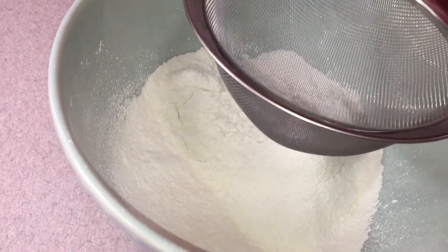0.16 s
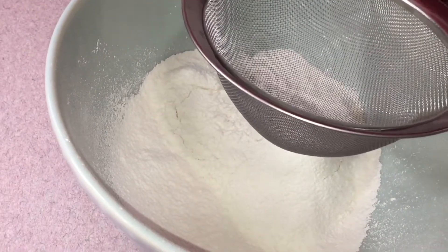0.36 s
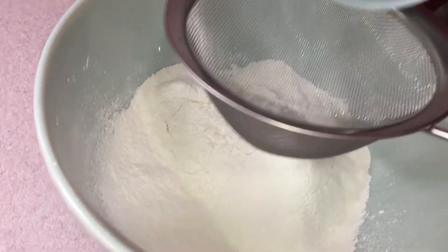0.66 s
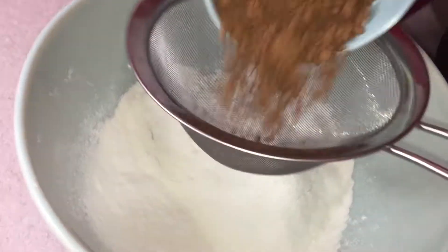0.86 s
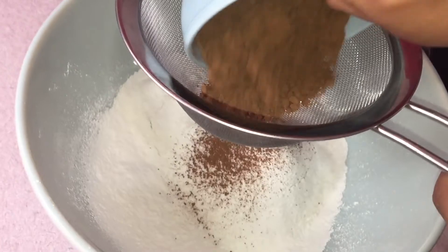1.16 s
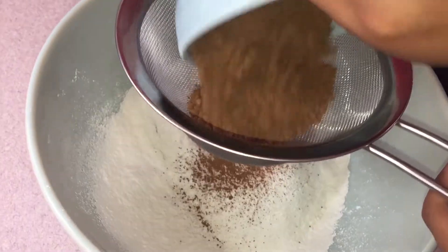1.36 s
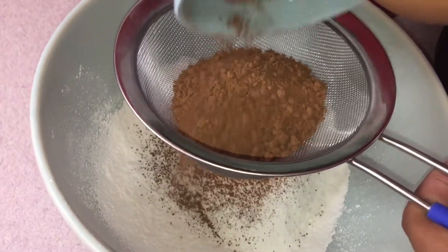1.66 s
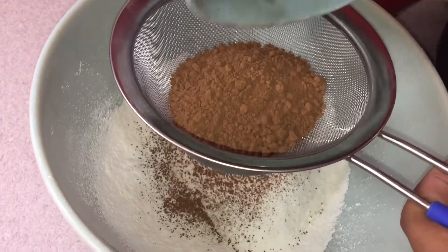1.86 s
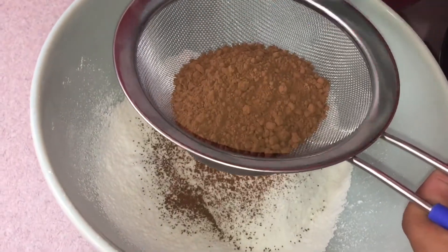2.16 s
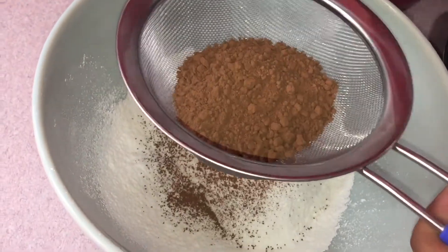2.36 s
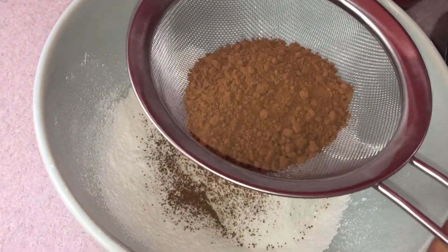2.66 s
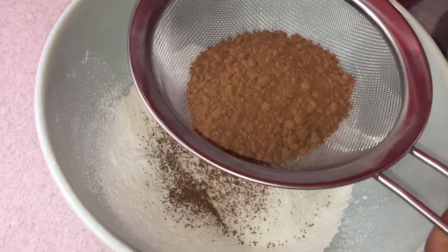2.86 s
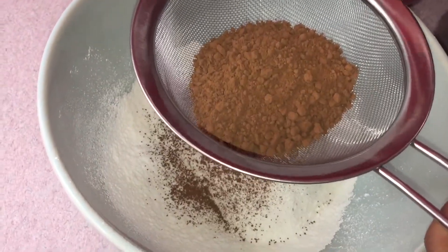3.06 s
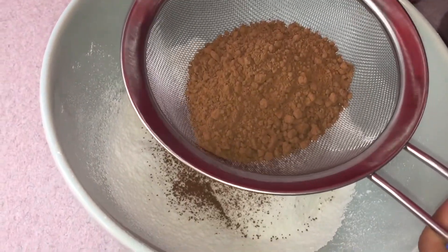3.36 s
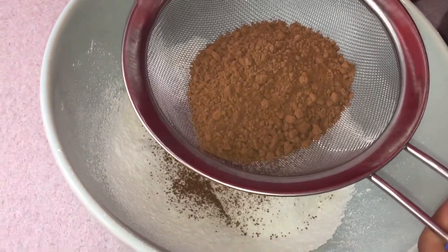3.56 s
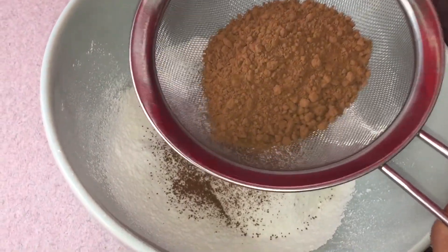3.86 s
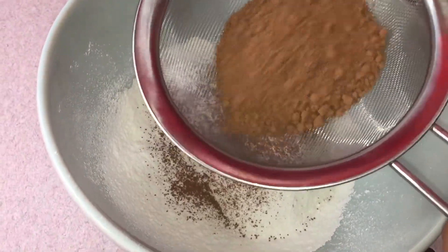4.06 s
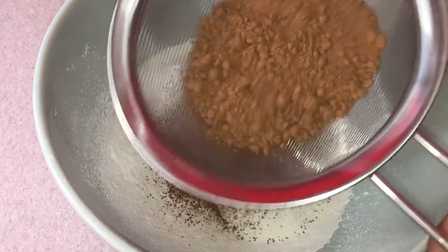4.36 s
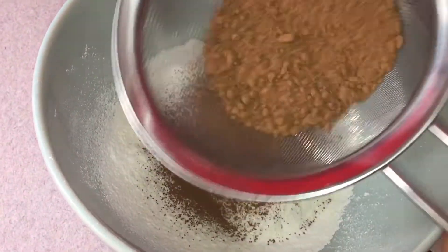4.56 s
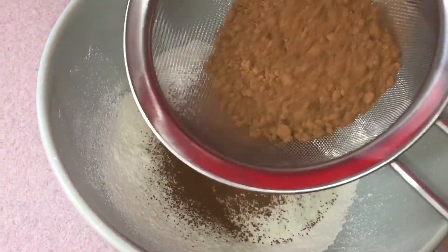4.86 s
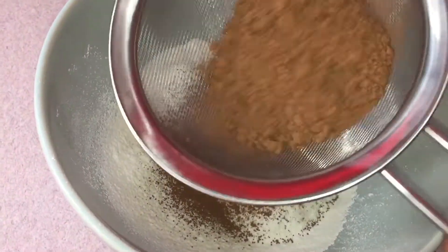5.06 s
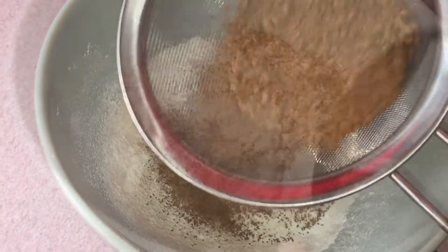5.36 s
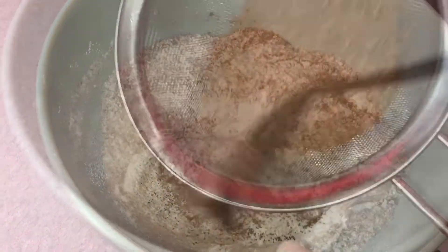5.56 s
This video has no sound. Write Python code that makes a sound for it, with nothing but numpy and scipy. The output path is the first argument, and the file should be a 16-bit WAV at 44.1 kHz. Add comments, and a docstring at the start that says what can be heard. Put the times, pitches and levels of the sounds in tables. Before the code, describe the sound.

In a quiet humming kitchen, faint powder pouring, a plastic cup rattling down on a table, then rhythmic raspy sieve taps with soft booms.

```python
"""Cocoa through a sieve

Cocoa is tipped from a plastic cup into a wire sieve over a mixing bowl, in a quiet, humming kitchen.
The cup ticks on the rim, then knocks on the table, rocks and settles. About five taps a second make the
sieve's mesh rasp and the powder hop and land, while dull bumps shake the table.
Noise makes the rasp, powder and air; short clicks and dying sines make the blows and their ringing.
"""
import sys
import numpy as np
from scipy import signal
from scipy.fft import rfft, irfft
from scipy.io import wavfile
from scipy.ndimage import uniform_filter1d

SR = 44100
rng = np.random.default_rng(int(sys.argv[2]) if len(sys.argv) > 2 else 0)


def wrap_up_sound(samples):
    """Save the sound to the file named by the first command line argument, as 16-bit audio."""
    columns = np.atleast_2d(samples).T
    # keep every value between -1 and 1, then stretch to whole-number steps
    tamed = np.clip(columns, -1, 1)
    steps = np.round(tamed * 32767).astype(np.int16)
    wavfile.write(sys.argv[1], SR, steps)


N = 252252  # length of the scene in samples

# taps on the sieve: (time [s], mesh rasp [dB], frame click [dB], hand's thud [dB], rebound against the tap [dB])
SIEVE_TAPS = [(4.0785, -54.5, -72, -54.5, -6), (4.2485, -47.5, -64.5, -56, -15.5),
              (4.431, -47.5, -53.5, -42.5, 6.5), (4.6208, -45.5, -50.5, -39, -0.5),
              (4.812, -43.5, -57, -34.5, -17), (5.0001, -44, -48.5, -39, -7), (5.189, -41.5, -42, -35, -29),
              (5.3757, -48, -49, -41.5, -23.5), (5.5616, -47, -49.5, -40.5, -24)]
# colour of the wire mesh: (frequency [Hz], relative level [dB])
MESH_COLOUR = [(1180, -1.5), (2000, -4), (2360, 3.5), (2570, -36), (2910, -10), (3520, -3), (6940, 6),
               (8930, 0.5), (10400, -5.5), (12200, -3), (15100, -8), (16000, -5.5)]
# colour of a hard contact with the table: (frequency [Hz], relative level [dB])
TABLE_CLICK_COLOUR = [(500, -18.5), (1500, -10), (2600, 9), (3450, -3.5), (4100, 0), (5000, -14), (6100, 1),
                      (7300, -5), (9000, -4), (10200, -12), (11000, -12.5), (13000, -24), (16000, -38.5)]


def sieve(snap_t60=0.025, rustle_db=-9, rustle_t60=0.15, rise_s=0.00055, grain_db=1.0):
    """Each tap clicks the frame and jolts the mesh, whose wires rasp as the grains skip over them."""
    # colour of the frame: (frequency [Hz], relative level [dB])
    frame_colour = [(100, -6), (330, 6.5), (420, 12.5), (540, -4), (680, 11), (1050, 0), (1250, -5.5),
                    (1800, -0.5), (2200, -8.5), (2900, 0.5), (4000, -11.5), (7000, -1), (16000, -80)]
    # colour of the hand's thud: (frequency [Hz], relative level [dB])
    thud_colour = [(25, -48), (45, -25), (68, 2), (110, 1), (165, -0.5), (240, -10.5), (340, -7),
                   (430, -17.5), (520, -18), (1000, -50), (3000, -62)]
    # the steel rim rings: (time [s], level [dB])
    pings = [(4.446, -55)]
    # ringing tones of the rim: (frequency [Hz], relative level [dB], time to fall 60 dB [s])
    rim_modes = [(2342, 0, .3), (2891, -9, .12), (3284, -3.5, .19), (4700, -6, .14)]
    rebound_s = 0.0146  # the mesh springs back and rasps again
    thud_delay_s = 0.002055  # the soft hand pushes a little later

    t = np.arange(SR // 3) / SR
    snap = gain_of(-60 * t / snap_t60)
    rustle = gain_of(rustle_db - 60 * t / rustle_t60)
    jolt = (snap + rustle) * (1 - np.exp(-t / rise_s))

    shake_power, frame, thuds = np.zeros((3, N))
    frame_click = click(frame_colour)
    thud = click(thud_colour, size=8192)
    for s, rasp_db, click_db, thud_db, rebound_db in SIEVE_TAPS:
        # overlapping jolts add as power
        add(shake_power, s, (gain_of(rasp_db) * jolt) ** 2)
        add(shake_power, s + rebound_s, (gain_of(rasp_db + rebound_db) * jolt) ** 2)
        add(frame, s, gain_of(click_db) * chatter(frame_click, db=5.0, t60=0.026))
        add(thuds, s + thud_delay_s, gain_of(thud_db) * thud)
    for s, db in pings:
        add(frame, s, gain_of(db) * ring(rim_modes))

    # the grains make the rasp's strength flicker quickly
    flicker = evened(uniform_filter1d(rng.standard_normal(N), size=40))
    grains = evened(gain_of(grain_db * flicker))
    rasp = np.sqrt(shake_power) * grains * noise(MESH_COLOUR)
    return room(rasp + frame + thuds, early_db=-15, tail_db=-14.0, early_t60=0.065)


def powder():
    """Cocoa hisses and patters as it pours onto the mesh, slides with each swing and lands after each tap."""
    # cocoa pours from the cup: (middle [s], length [s], hiss level [dB])
    pours = [(0.823, 0.49, -79.5), (0.978, 0.1, -65), (1.263, 0.21, -77), (1.447, 0.084, -76.5)]
    # colour of the soft patter: (frequency [Hz], relative level [dB])
    patter_colour = [(200, -18), (500, 11.5), (780, 11), (1200, 8), (1700, 4), (3000, 2.5), (6000, -60),
                     (15000, -45)]
    pour_patter_db = -5  # patter against the hiss
    powder_top_hz = 11500  # loose powder hisses more dully than the tapped mesh
    # slide during the swing and landing after the hop; levels are against the tap's rasp
    swing_lead_s, swing_s, swing_hiss_db, swing_patter_db = 0.0075, 0.057, -24, -24
    hop_s, landing_s, landing_hiss_db, landing_patter_db = 0.074, 0.057, -23, -20

    flows = [(s, length, db, db + pour_patter_db) for s, length, db in pours]
    for s, rasp_db, *_ in SIEVE_TAPS:
        flows.append((s - swing_lead_s, swing_s, rasp_db + swing_hiss_db, rasp_db + swing_patter_db))
        flows.append((s + hop_s, landing_s, rasp_db + landing_hiss_db, rasp_db + landing_patter_db))

    hiss_level, patter_level = np.zeros((2, N))
    for s, length, hiss_db, patter_db in flows:
        flow = swell(s, length)
        hiss_level += gain_of(hiss_db) * flow
        patter_level += gain_of(patter_db) * flow
    hiss = evened(cut(noise(MESH_COLOUR), "low", powder_top_hz))
    return hiss_level * hiss + patter_level * noise(patter_colour)


# something tips with a dull bump, then rocks to rest, two bumps to a rock
TIP_S = 4.4878


def rocking(count=9):
    """Lists bumps as (time, boom dB, knock dB); each rock is shorter and weaker than the one before."""
    tip_boom_db, tip_knock_db = -28.5, -41.5
    # each rock lasts shrink times the one before; the second bump comes after return_share of it
    start_s, first_period_s, shrink, return_share = 4.535, 0.074, 0.965, 0.35
    first_boom_db, boom_db_per_s = -30, -42.5
    first_knock_db, knock_fade_s = -46, 0.47  # the time in which the knock loses 20 dB
    return_boom_db, return_knock_db = 2, 2  # the second bump of a rock against the first

    blows = [(TIP_S, tip_boom_db, tip_knock_db)]
    age = 0
    for period in first_period_s * shrink ** np.arange(count):
        s = start_s + age
        # the boom sinks evenly, while the knock holds and then drops
        boom_db = first_boom_db + boom_db_per_s * age
        knock_db = first_knock_db - 20 * (age / knock_fade_s) ** 2
        blows.append((s, boom_db, knock_db))
        blows.append((s + return_share * period, boom_db + return_boom_db, knock_db + return_knock_db))
        age += period
    return blows


def bumps():
    """A run of soft bumps, each a short woody knock, sets the table booming."""
    # ringing tones of the table's boom: (frequency [Hz], relative level [dB], time to fall 60 dB [s])
    boom_modes = [(68.4, -12, 0.64), (100, -9, 0.2), (147.3, 7.5, 0.118), (202, -3, 0.057)]
    # colour of each bump's knock: (pitch factor, relative level [dB])
    knock_colour = [(.2, -31), (.6, -7), (.85, -4), (1.02, 6.5), (1.2, -3), (1.5, -10.5), (2.1, -21.5),
                    (3.2, -26), (7, -53)]
    first_hz, hz_per_s = 476, -110  # the knocks sink in pitch
    boom_delay_s = 0.0028

    out = np.zeros(N)
    boom = cut(ring(boom_modes), "low", 260)
    for s, boom_db, knock_db in rocking():
        hz = first_hz + hz_per_s * (s - TIP_S)
        knock = click([(hz * factor, db) for factor, db in knock_colour])
        add(out, s, gain_of(knock_db) * chatter(knock, db=-7, t60=0.047))
        add(out, s + boom_delay_s, gain_of(boom_db) * boom)
    return room(out, early_db=-3.5, tail_db=-9, early_t60=0.033)


def cup_on_table():
    """The cup lands, rocks and settles; soft contacts sound duller and click less than hard ones."""
    # the cup's knocks: (time [s], strength [dB], hardness as a cut-off [Hz])
    cup_knocks = [(3.354, -23.5, 2670), (3.399, -30, 695), (3.418, -30, 675), (3.538, -31, 860),
                  (3.567, -39, 950), (3.581, -35, 990), (3.611, -25.5, 2700), (3.631, -34, 1050),
                  (3.648, -33.5, 1930), (3.664, -39.5, 1370)]
    # colour of the table's knock: (frequency [Hz], relative level [dB])
    table_colour = [(60, -27.5), (115, -25), (165, 4.5), (225, -16.5), (300, -2), (355, 0), (460, -4.5),
                    (595, 3), (720, -5), (930, 2), (1215, -2.5), (1420, -5), (1620, -7), (2100, -13),
                    (4000, -29.5)]
    # ringing tones of the table top: (frequency [Hz], relative level [dB], time to fall 60 dB [s])
    table_modes = [(167, -6, .2), (296, -13, .22), (363, -7, .12), (411, -7, .18), (612, -1, .17),
                   (745, -6, .12), (877, 0, .16), (985, -2, .1), (1095, -5, .14), (1208, 2, .19),
                   (1370, -6, .17), (1570, -3, .13), (1690, -8, .13), (1860, -10, .11)]
    # ringing tones of the cup's thin wall: (frequency [Hz], relative level [dB], time to fall 60 dB [s])
    wall_modes = [(3240, -7.5, .035), (4460, -6, 0.022), (6310, -3.5, 0.054), (7190, -3, 0.04),
                  (8260, -4, 0.02), (9950, -3.5, 0.033)]
    # each knock lands on one edge of the foot, then slaps flat, about as strongly but duller
    flat_s, flat_db, flat_hardness = 0.0048, 0.5, 0.65
    # the click's level against the body at this hardness, and its rise with each doubling of hardness
    hard_ref_hz, click_ref_db, click_db_per_octave = 2400, -22, 9

    # a small thing radiates no deep bass
    body = click(table_colour) + gain_of(-17.5) * cut(ring(table_modes), "high", 170)
    contact = click(TABLE_CLICK_COLOUR) + gain_of(-11.5) * ring(wall_modes)
    knocks, clicks = np.zeros((2, N))
    for s, db, hard_hz in cup_knocks:
        edge_blow = (0, db, hard_hz)
        flat_blow = (flat_s, db + flat_db, hard_hz * flat_hardness)
        for delay, blow_db, hz in [edge_blow, flat_blow]:
            knock = chatter(cut(body, "low", hz), db=3.0, t60=0.036)
            add(knocks, s + delay, gain_of(blow_db) * knock)
        click_db = db + click_ref_db + click_db_per_octave * np.log2(hard_hz / hard_ref_hz)
        add(clicks, s, gain_of(click_db) * chatter(contact, db=5.5, t60=0.022))
    knocks = room(knocks, early_db=-11.5, tail_db=-9.5, early_t60=0.092)
    clicks = room(clicks, early_db=-11.5, tail_db=-7.5, early_t60=0.027)
    return knocks + clicks


def scuff():
    """The cup's foot scuffs the table before it settles: a brief, dry rub made of bright noise."""
    # the rub: (middle [s], length [s], level [dB])
    s, length, db = (3.535, .08, -70)
    rub = evened(cut(noise(TABLE_CLICK_COLOUR), "high", 6500))
    return gain_of(db) * swell(s, length) * rub


def cup_on_rim():
    """The cup touches the rim: a light plastic tick with a short hollow ring."""
    # the touches: (time [s], level [dB])
    touches = [(1.1197, -42)]
    # ringing tones of the cup: (frequency [Hz], relative level [dB], time to fall 60 dB [s])
    cup_modes = [(385, 6.5, 0.066), (430, -9, 0.029), (1100, -34, .03), (1380, -11, 0.017),
                 (1700, -20, 0.037), (1980, 1, 0.1), (2270, -3, 0.16), (2560, -8, .1), (2800, -16, 0.056),
                 (2920, -19, .04), (7390, -1, 0.038), (7300, -11, 0.03), (8700, -29, .04)]
    # colour of the contact click: (frequency [Hz], relative level [dB])
    cup_click_colour = [(250, -27), (370, -26), (550, -14), (900, -3.5), (1400, -3.5), (2650, 4),
                        (3300, -8), (3860, -17), (6000, -11), (7400, -9), (9400, -12.5), (10300, -21),
                        (12900, -25), (16000, -36)]

    out = np.zeros(N)
    tick = gain_of(-8.0) * ring(cup_modes) + gain_of(-2.5) * click(cup_click_colour)
    for s, db in touches:
        add(out, s, gain_of(db) * chatter(tick, db=0, t60=0.016))
    return room(out, early_db=-6, tail_db=-18.5, early_t60=0.081)


def wires():
    """Single wires give faint, bright ticks as the mesh flexes."""
    # the ticks: (time [s], level [dB], pitch [Hz])
    wire_ticks = [(0.526, -70.5, 8600), (1.549, -70.5, 4870), (4.031, -66.5, 7800)]
    # colour of a tick: (pitch factor, relative level [dB])
    wire_colour = [(.3, -28), (.7, -18), (1, -6), (1.16, -8), (1.3, -29)]

    out = np.zeros(N)
    for s, db, hz in wire_ticks:
        tick = click([(hz * factor, level) for factor, level in wire_colour])
        add(out, s, gain_of(db) * chatter(tick, db=3, t60=0.068))
    return out


def whirr():
    """A faint, distant low whirr near the start: coloured noise that swells and dies away."""
    # its loudness over time: (time [s], level [dB])
    whirr_level = [(0, -82.5), (.55, -68.5), (.85, -84), (1.2, -99)]
    # its colour: (frequency [Hz], relative level [dB])
    whirr_colour = [(180, -34.5), (270, -6), (350, -1), (400, -10), (520, -29), (1500, -65.5)]
    t = np.arange(N) / SR
    return gain_of(np.interp(t, *np.transpose(whirr_level))) * noise(whirr_colour)


def kitchen(waver_db=3.5):
    """Soft air noise, a faint hum of wavering sines, and a low noise drone that swells and sinks."""
    # colour of the air: (frequency [Hz], relative level [dB])
    air_colour = [(40, -8), (90, 5.5), (140, -4), (210, -6.5), (300, -9), (450, -17), (1000, -20),
                  (2000, -21.5), (4000, -24.5), (5000, -28), (6200, -27), (9300, -29.5), (10400, -33.5),
                  (11500, -30), (16000, -35)]
    # tones of the hum: (frequency [Hz], middle level [dB])
    hum_tones = [(59.2, -67), (114.5, -73.5), (172.3, -70)]
    # loudness of the drone over time: (time [s], level [dB])
    drone_level = [(0.0, -48), (0.06, -50.5), (0.64, -60), (1.45, -50), (1.59, -62.5), (2.29, -49.5),
                   (2.82, -75), (3.03, -48), (3.66, -56), (3.76, -74), (3.94, -50), (4.22, -59),
                   (4.6, -37.5), (4.81, -51), (5.11, -40), (5.53, -60.5), (5.58, -53), (5.72, -72.5)]
    # colour of the drone: (frequency [Hz], relative level [dB])
    drone_colour = [(20, -9.5), (36, -10), (48, -12.5), (57, 12.5), (64, 6.5), (75, -11), (95, -20.5),
                    (140, -48.5), (400, -100)]

    t = np.arange(N) / SR
    air = gain_of(-65) * noise(air_colour)
    hum = np.zeros(N)
    for hz, db in hum_tones:
        # one slow random drift moves both the level and the phase
        waver = evened(uniform_filter1d(rng.standard_normal(N), size=6000))
        phase = 2 * np.pi * (hz * t + rng.random()) + 0.5 * waver
        hum += gain_of(db + waver_db * waver) * np.sin(phase)
    drone = noise(drone_colour)
    drone /= np.sqrt(uniform_filter1d(drone ** 2, SR // 6))  # level out its own slow swells
    return air + hum + gain_of(np.interp(t, *np.transpose(drone_level))) * drone


def room(x, early_db, tail_db, early_t60):
    """Adds quick reflections from bowl and worktop, and the kitchen's tail, each band dying at its own speed."""
    # the tail's decay: (frequency [Hz], time to fall 60 dB [s])
    tail_t60 = [(100, 0.31), (300, 0.32), (700, 0.25), (1300, 0.38), (2500, 0.23), (6000, 0.17),
                (14000, 0.11)]
    t = np.arange(SR // 2) / SR
    # sparse random echoes, about 5000 a second, of either sign
    signs = rng.choice([-1., 1.], (2, len(t)))
    near, far = signs * (rng.random((2, len(t))) < 5000 / SR)
    near *= gain_of(-60 * t / early_t60) * (t > 0.0012)

    hz, when, bands = signal.stft(far, SR, nperseg=256)
    bands = bands * gain_of(-60 * when / read(tail_t60, hz)[:, None])
    far = signal.istft(bands, SR, nperseg=256)[1][:len(t)]
    far *= np.clip((t - 0.004) / 0.0041, 0, 1)  # the tail fades in after 4 ms

    echoes = gain_of(early_db) * near / np.linalg.norm(near)
    echoes += gain_of(tail_db) * far / np.linalg.norm(far)
    return x + signal.oaconvolve(x, echoes)[:N]


def chatter(x, db, t60):
    """No contact is clean: a dying burst of tiny re-contacts follows it, new for every blow."""
    t = np.arange(SR // 10) / SR
    burst = rng.standard_normal(len(t)) * gain_of(-60 * t / t60)
    burst = gain_of(db) * burst / np.linalg.norm(burst)
    return x + signal.oaconvolve(x, burst)[:len(x)]


def click(colour, size=2048):
    """The sharpest click with the given colour that starts at once, followed by silence."""
    log_gain = np.log(gain_of(read(colour, abs(np.fft.fftfreq(size, 1 / SR)))))
    spectrum = np.exp(signal.hilbert(log_gain).conj())  # minimum phase packs the energy at the start
    pulse = np.fft.ifft(spectrum).real[:size // 2]
    return struck(np.pad(pulse, (0, SR // 2 - len(pulse))))


def ring(modes):
    """Ringing of a struck thing: one dying sine for each (Hz, dB, t60) mode."""
    t = np.arange(SR // 2) / SR
    return struck(sum(gain_of(db - 60 * t / t60) * np.sin(2 * np.pi * hz * t) for hz, db, t60 in modes))


def noise(colour):
    """Steady noise of rms 1 with the given colour."""
    spectrum = rfft(rng.standard_normal(N))
    spectrum = spectrum * gain_of(read(colour, np.fft.rfftfreq(N, 1 / SR)))
    return evened(irfft(spectrum, N))


def cut(x, kind, edge_hz):
    """A second-order low-pass or high-pass filter."""
    return signal.lfilter(*signal.butter(2, min(edge_hz, SR / 4), kind, fs=SR), x)


def swell(s, length):
    """A smooth rise and fall around time s."""
    return np.cos(np.pi * np.clip((np.arange(N) / SR - s) / length, -0.5, 0.5)) ** 2


def gain_of(db):
    """Turns decibels into amplitude."""
    return 10 ** (np.asarray(db) / 20)


def evened(x):
    """Scales a sound to rms 1."""
    return x / np.sqrt(np.mean(x ** 2) + 1e-20)


def struck(x):
    """Scales a dying sound to rms 1 over its first 5 ms."""
    return x / np.sqrt(np.mean(x[:SR // 200] ** 2) + 1e-20)


def read(points, hz):
    """Reads a (Hz, value) table on a log-frequency axis."""
    f, value = np.transpose(points)
    return np.interp(np.log(hz + 1), np.log(f + 1), value)


def add(mix, s, sound):
    """Mixes a sound in at time s, cut off at the end of the mix."""
    part = mix[round(s * SR):][:len(sound)]
    part += sound[:len(part)]


def scene():
    """All sources at one close microphone."""
    taps = sieve() + powder() + bumps()
    cup = cup_on_table() + scuff() + cup_on_rim()
    background = wires() + whirr() + kitchen()
    return (taps + cup + background)[None]


def record(dry):
    """The closing fade, the microphone's steep bass roll-off and the band limit."""
    # everything sinks a little at the end: (time [s], level [dB])
    fade = [(5.4, 0.5), (5.72, -2.5)]
    faded = dry * gain_of(np.interp(np.arange(N) / SR, *np.transpose(fade)))
    thinned = signal.sosfilt(signal.butter(4, 50, "high", fs=SR, output="sos"), faded)
    band_limit = signal.firwin(511, 16200, window=("kaiser", 9), fs=SR)  # low-pass at 16200 Hz
    return signal.oaconvolve(thinned, band_limit[None], "same")


dry = scene()
out = record(dry)
wrap_up_sound(out)
```